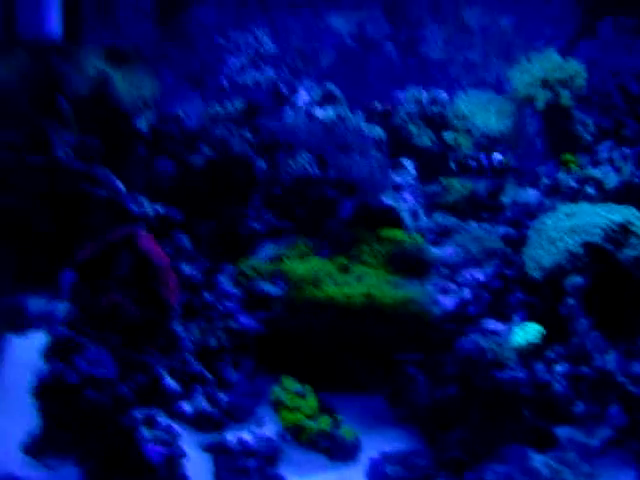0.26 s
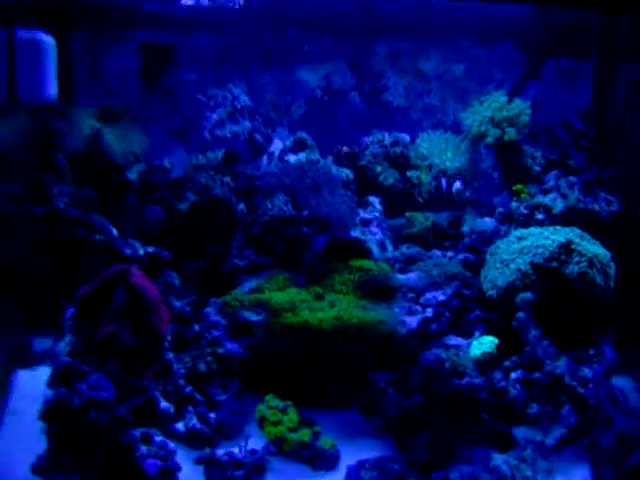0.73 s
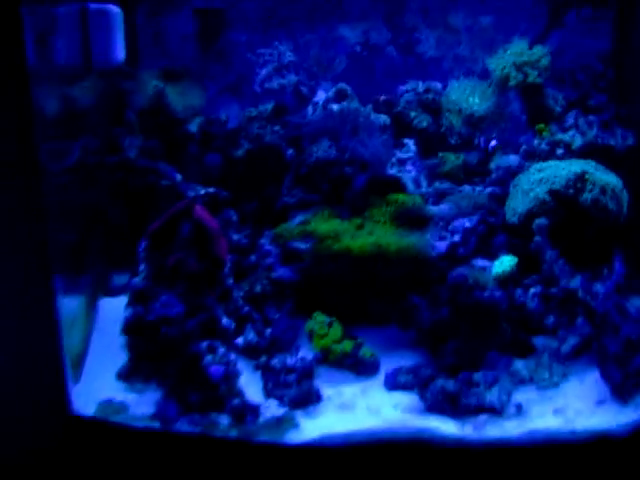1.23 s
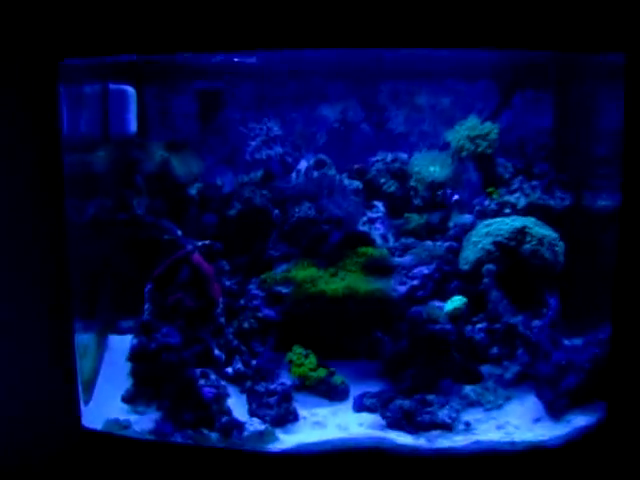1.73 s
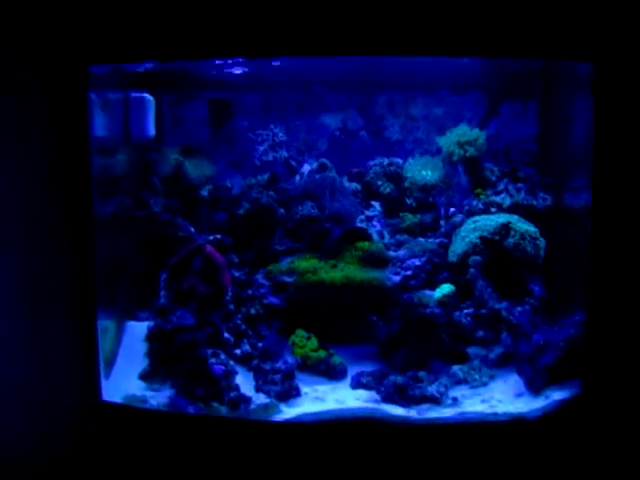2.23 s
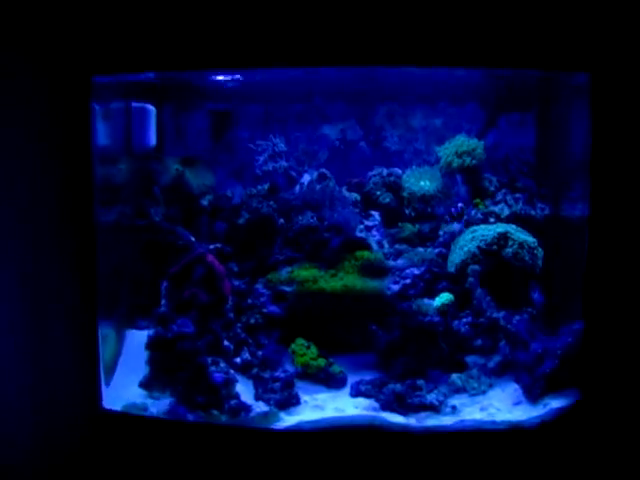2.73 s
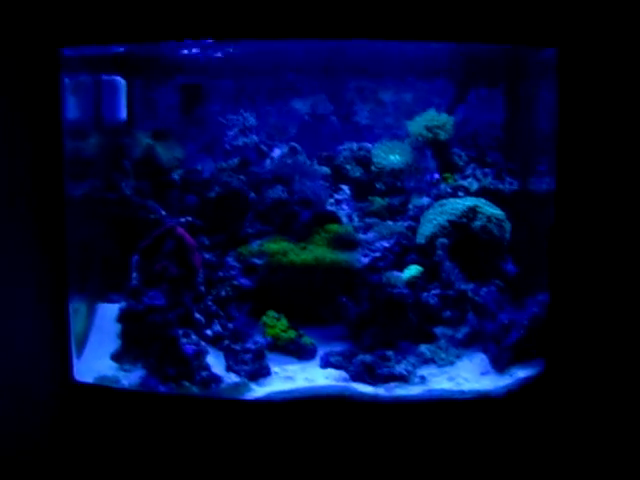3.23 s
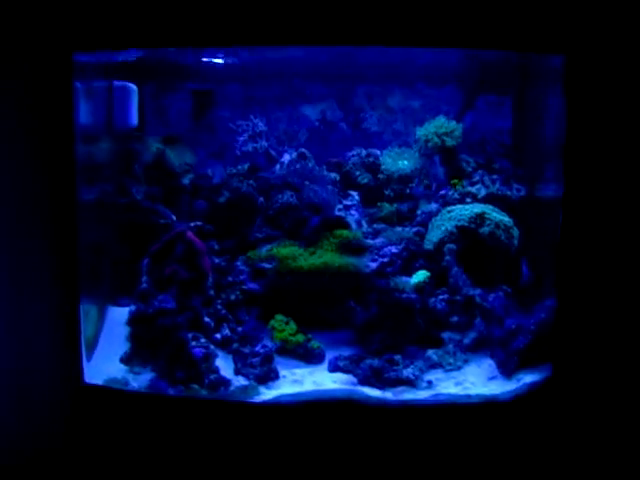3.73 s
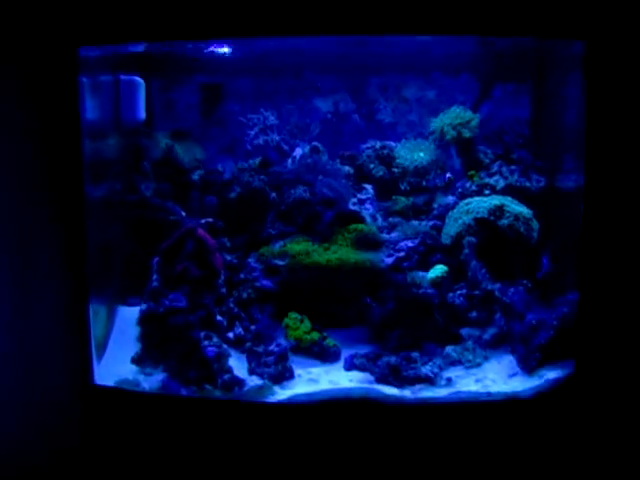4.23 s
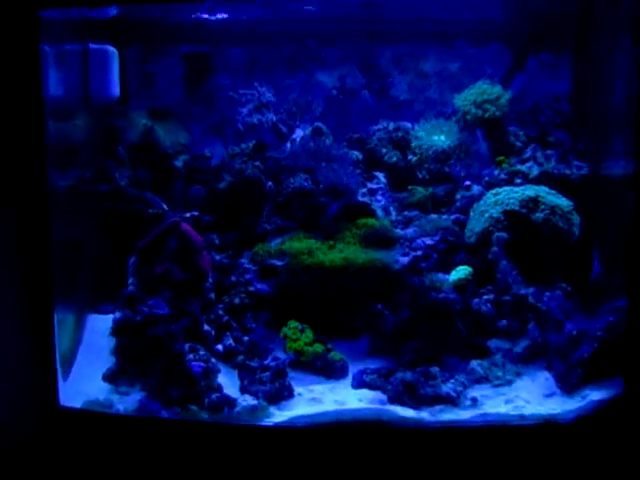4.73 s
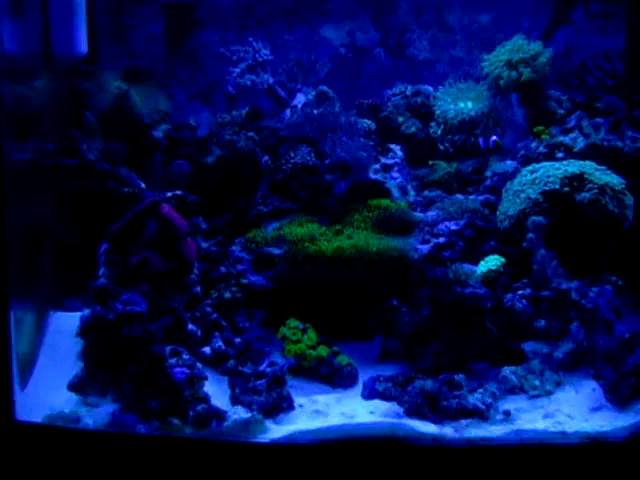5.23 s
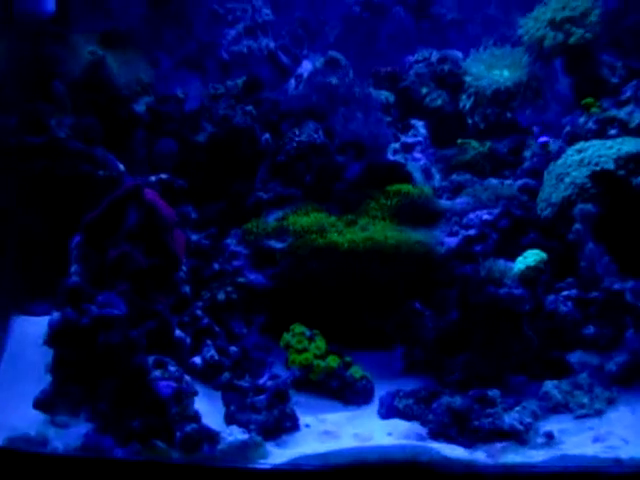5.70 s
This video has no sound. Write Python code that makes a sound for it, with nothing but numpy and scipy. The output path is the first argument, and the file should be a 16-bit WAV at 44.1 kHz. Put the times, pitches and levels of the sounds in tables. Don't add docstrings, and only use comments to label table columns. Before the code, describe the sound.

A close, small microphone in a short-echo room picks up trickling tank water, faint bubbles, steady pump hum and airy hiss. A chair leg stutters over the floor within the first second, cracking grit, then drops. Muffled steps thump on boards around two seconds, cloth brushes at three, and light case ticks continue, with a splashier trickle and faint knocks near the end.

```python
import sys
import numpy as np
from scipy import signal
from scipy.fft import rfft, irfft, next_fast_len
from scipy.io import wavfile
from scipy.ndimage import uniform_filter1d, map_coordinates

SR = 44100
rng = np.random.default_rng(int(sys.argv[2]) if len(sys.argv) > 2 else 0)


def invert_db(level):
    return 10 ** (np.asarray(level, dtype=float) / 20)


def store_pcm(level_fs):
    pcm = np.round(np.clip(level_fs, -1, 1) * 32767).astype(np.int16)
    wavfile.write(sys.argv[1], SR, np.atleast_2d(pcm).T)


N = 262836
MIDDLING_DB = -48


def unit(x):
    return x / np.sqrt(np.mean(x ** 2) + 1e-20)


def along(points, hz):
    f, v = np.transpose(points)
    return np.interp(np.log(hz + 1), np.log(f + 1), v)


def curve(points):
    s, value = np.transpose(points)
    return np.interp(np.arange(N) / SR, s, value)


def wobble(rate):
    knots = rng.standard_normal(int(N * rate / SR) + 4)
    return map_coordinates(knots, [np.arange(N) * rate / SR])


def filtered(x, response):
    m = next_fast_len(N + SR // 2)
    return irfft(rfft(x, m) * response(np.fft.rfftfreq(m, 1 / SR)), m)[:N]


def modes(table):
    def response(f):
        total = 0
        for k, (hz, width, db) in enumerate(table):
            total = total + (-1) ** k * invert_db(db) * 1j * f * width / (hz * hz - f * f + 1j * f * width)
        return total
    return response


def tuned(hz, table):
    return [(f, width, db) for f, (width, db) in zip(hz, table)]


def grit(rate, spread_db):
    hit, size, sign = rng.random((3, N))
    height = invert_db(-spread_db * np.log(size + 0.38))
    return unit((hit < rate / SR) * height * np.sign(sign - 0.5))


def add(track, s, sound):
    part = track[round(s * SR):][:len(sound)]
    part += sound[:len(part)]


def ring(db, hz, t60, rise, rough):
    t = np.arange(SR // 4) / SR
    drift = rough * np.cumsum(rng.standard_normal(len(t))) / np.sqrt(SR)
    return invert_db(db - 60 * t / t60) * (1 - np.exp(-t / rise)) * np.sin(2 * np.pi * hz * t + drift)


def swell(s, rise, fall):
    t = np.arange(N) / SR - s
    return invert_db(-20 * np.abs(t / np.where(t < 0, rise, fall)))


# time in seconds, peak in dB.
SLIPS = [(.4161, -26.5), (.4325, -28.5), (.4467, -28.5), (.4605, -28), (.4729, -28), (.4858, -28),
         (.4991, -27.5), (.5119, -28.5), (.5248, -27.5), (.5383, -27.5), (.5513, -27.5), (.5645, -27.5),
         (.5785, -27.5), (.594, -29.5), (.6561, -25.5), (.7295, -26.5), (.7808, -27), (.8277, -25.5),
         (.843, -31), (.8569, -30.5), (.872, -31), (.8863, -31.5), (.9012, -31.5), (.9145, -30),
         (.9252, -33), (.935, -34.5), (.9434, -32), (.9561, -32.5), (.9644, -34), (.973, -33),
         (.9804, -32.5), (.9872, -33), (.9911, -34.5), (.9962, -33.5), (1.0005, -28), (1.0052, -33),
         (1.0106, -32.5), (1.0196, -35.5), (1.0319, -38), (1.0433, -33), (1.051, -37), (1.0554, -36),
         (1.0599, -35)]
# delay in seconds, level in dB.
ECHOES = [(.0007, 3), (.0027, 0), (.0081, -3), (.0146, -7), (.026, -4), (.035, -10)]
WOOD_HZ = [185, 232, 292, 385, 424, 518, 677, 746, 792, 991, 1025, 1069, 1145, 1195, 1260, 1320, 1422, 1560,
           1760, 1945, 2260, 2440, 2650, 2830, 3120, 3400, 4680, 5150]
# width in Hz, level in dB.
WOOD = [(39.8, -26), (39.7, -13.5), (39.7, -16.5), (29.4, -10), (16, 5), (21, -4.5), (31, -10.5),
        (20, -9.5), (30.8, -7.5), (20, -13.5), (17.8, -8), (20, -12), (19.7, -10.5), (20, -9.5), (20, -17),
        (22, -11), (21.9, -14), (30, -14), (149, -23), (51, -20), (70, -18.5), (35, -11), (50, -24.5),
        (40, -21.5), (60, -24), (60, -30), (70, -30.5), (80, -26.5)]
# frequency in Hz, level in dB per Hz.
DUST = [(800, 1.5), (2500, -2.5), (4900, -11), (6500, -12), (14000, -26)]
# start in seconds, lift in seconds, grit level in dB, drift in dB per second.
DRAG = [
    (0.422, 0.594, -53.5, 6),
    (0.776, 0.813, -46.5, 0),
    (0.822, 0.99, -55, 0),
    (1.034, 1.086, -61, -36),
]
# peak time in seconds, level in dB, rise in seconds, fall
# in seconds.
GRIT_SWELL = (0.81, -49, 0.82, 0.37)


def chair():
    wood_modes = tuned(WOOD_HZ, WOOD)
    seat, frame = modes(wood_modes[:4]), modes(wood_modes[4:])
    click = modes([(1300, 1400, 0)])

    def body(hz):
        return frame(hz) - seat(hz)

    def wood(hz):
        echoes = sum(invert_db(db - 31.5) * np.exp(-2j * np.pi * hz * s) for s, db in ECHOES)
        return body(hz) + click(hz) ** 2 * echoes

    scrape = unit(filtered(grit(900, 4.1), body))
    dust = unit(filtered(grit(2500, 1.6), lambda hz: invert_db(along(DUST, hz))))
    slips = np.zeros(N)
    for s, db in SLIPS:
        slips[round(s * SR)] = invert_db(db + 1.5)
    one_slip = filtered(np.arange(N) == 0, wood)
    out = filtered(slips, wood) / np.abs(one_slip).max()

    t = np.arange(SR // 5) / SR
    out += invert_db(-29) * dust * signal.fftconvolve(slips, np.exp(-t / 0.013))[:N]
    s, db, rise, fall = GRIT_SWELL
    out += invert_db(db) * swell(s, rise, fall) * dust

    for start, lift, dust_db, drift in DRAG:
        since = np.clip(np.arange(N) / SR - start, 0, 1)
        lifted = np.maximum(since - (lift - start), 0)
        load_db = drift * since - 600 * lifted
        grit_db = dust_db + 297 * lifted
        roughen = 1 - np.exp(-since / 0.0054)
        out += roughen * invert_db(load_db) * (invert_db(-47) * scrape + invert_db(grit_db) * dust)
    return out


# time in seconds, board level in dB, board pitch in Hz,
# ring time (60 dB) in seconds, edge level in dB.
DROPS = [
    (1.0015, -19.5, 418.6, 0.1, -55),
    (1.003, -29, 513, 0.056, -58),
    (1.045, -52, 430, 0.03, -50),
    (1.058, -37, 664, 0.12, -45),
]
# time in seconds, board level in dB, board pitch in Hz, edge level in dB.
STEPS = [(1.266, -72, 497, -34), (1.38, -43.5, 550, -57), (1.605, -39, 480, -64), (1.618, -39, 960, -53),
         (1.71, -44, 595, -35.5), (1.739, -34.5, 594, -57), (1.747, -33, 820, -55), (1.751, -37, 560, -53),
         (1.762, -42, 910, -54), (1.8677, -33.5, 395, -58), (1.88, -42, 806, -47),
         (1.9015, -31.5, 400, -53), (1.906, -35, 920, -42), (1.918, -66, 500, -37), (2.041, -40, 416, -42),
         (2.048, -63, 503, -41), (1.743, -44, 336, -60), (1.868, -41, 274, -60), (1.9025, -34.5, 280, -60),
         (2.046, -48, 205, -60), (2.142, -45, 425, -58), (2.393, -43, 448, -63), (3.501, -49, 520, -55),
         (5.73, -50, 781, -51), (5.371, -46, 1400, -60), (5.376, -46, 650, -59), (5.391, -46, 800, -55),
         (5.407, -59, 1300, -47), (5.78, -39, 650, -61), (5.791, -50, 517, -61), (5.922, -47, 890, -51)]


def knocks():
    out, t = np.zeros(N), np.arange(SR // 4) / SR
    joist_hz = 228
    contacts = list(DROPS)
    for s, board_db, board_hz, edge_db in STEPS:
        t60 = 0.022 * invert_db(0.13 * (MIDDLING_DB - board_db))
        contacts.append((s, board_db, board_hz, t60, edge_db))
    for s, board_db, board_hz, t60, edge_db in contacts:
        joist_db = -49 + 0.24 * (board_db - MIDDLING_DB) - 11.5 * np.log2(board_hz / (2 * joist_hz))
        joist_db += 6 * (s == DROPS[0][0])
        noise = signal.lfilter([1, -1], [1, -1.8, 0.83], rng.standard_normal(len(t)))
        heel = invert_db(board_db - 31 - 60 * t / 0.0028)
        edge = noise * (invert_db(edge_db - 19 - 60 * t / 0.066) + heel)
        board = ring(board_db + 3, board_hz, t60, rise=0.02 * t60, rough=0.5 / t60)
        pitch = joist_hz * invert_db(0.6 * rng.standard_normal())
        joist = ring(joist_db + 4.5, pitch, 0.064, rise=0.00064, rough=31.3)
        add(out, s, board + joist + edge)
    return out


# time in seconds, peak in dB, pitch in Hz, ring time (60 dB) in seconds.
BUMPS = [
    (.815, -46, 35, 0.18),
    (4.1484, -41.5, 168, 0.007),
    (5.54, -43.5, 70, 0.033),
    (5.749, -47.5, 60, 0.047),
]


def bumps():
    out = np.zeros(N)
    for s, db, hz, t60 in BUMPS:
        add(out, s, -ring(db + 15.5, hz, t60, rise=0.079 * t60, rough=0))
    return out


# time in seconds, peak in dB, pitch in Hz.
TICKS = [(0.2153, -46, 3040), (0.393, -43, 3270), (0.617, -44, 3000), (0.985, -37, 2450),
         (1.1615, -39, 3670), (1.4152, -50, 4800), (1.5555, -44, 4620), (1.757, -44, 4400),
         (1.878, -50, 3070), (2.0032, -48, 2900), (2.6715, -41.5, 2670), (3.368, -53, 4800),
         (3.504, -49, 3120), (3.7163, -43.5, 4000), (4.132, -44.5, 4060), (4.2428, -42.5, 2910),
         (4.358, -53, 3100), (4.468, -44, 3200), (4.571, -45, 3000), (4.8092, -40.5, 2790),
         (4.97, -44, 2780), (5.226, -42, 2630), (5.73, -41, 2790)]
# time in seconds, peak in dB, pitch in Hz.
SNAPS = [(1.082, -45, 2630), (1.488, -47, 4500), (1.674, -45, 5430), (1.2655, -42, 2450),
         (2.6405, -41, 2450), (2.882, -53, 2880), (3.281, -48, 2620), (3.546, -38, 2560),
         (3.628, -49, 2940), (3.847, -44, 2750), (5.75, -45.5, 2600)]
# time in seconds, peak in dB, pitch in Hz.
GRAINS = [
    (.8422, -38, 3020),
    (0.849, -23.5, 3370),
    (0.85, -33, 5060),
    (0.852, -22, 3440),
    (.8535, -33.5, 4900),
    (4.1504, -42, 1730),
]
# time in seconds, peak in dB, pitch in Hz, snap in dB, ring time in seconds.
CRACK = (4.1501, -33, 5900, -13, .004)


def ticks():
    out, t = np.zeros(N), np.arange(SR // 4) / SR
    events = [CRACK]
    for table, snap_db, t60 in [(TICKS, -16, 0.021), (SNAPS, -10, 0.021), (GRAINS, -16, 0.008)]:
        events += [(*row, snap_db, t60) for row in table]
    for s, db, hz, snap_db, t60 in events:
        snap = invert_db(db + snap_db - 60 * t / 0.0056) * np.diff(rng.standard_normal(len(t) + 1))
        add(out, s, ring(db + 1.5, hz, t60, rise=0.05 * t60, rough=55) + snap)
    return out


# time in seconds, flow in dB.
FLOW = [(0, 4), (.3, -6), (.7, 1), (1.2, -2), (1.55, 3.5), (2.0, 2), (2.5, -1.5), (3.1, -0.5), (3.9, -3.5),
        (4.5, 0), (5.2, -0.5), (5.47, 6.5), (5.65, -2.5), (5.96, -6)]
PIPE_HZ = [781, 845, 1117, 1535, 1780, 1958, 2344, 2465, 2900]
# width in Hz, level in dB.
PIPE = [(24.3, -1), (34.3, -6.5), (33.7, -12), (25.2, -9.5), (21, -10), (35.2, -7), (38, -8.5),
        (58.3, -6.5), (53, -12.5)]
# time in seconds, peak in dB, pitch in Hz.
LOW_DRIPS = [(1.52, -45, 990), (1.562, -43, 766), (2.312, -48, 784), (3.209, -45.5, 808), (4.685, -52, 788),
             (5.374, -56, 742), (5.562, -40, 830), (5.664, -47.5, 779), (5.695, -48, 843),
             (5.778, -53, 653)]
MID_DRIPS = [(0.035, -47.5, 1946), (0.2234, -47.5, 1973), (1.1039, -47.5, 1954), (1.2855, -43, 1960),
             (1.469, -45, 1767), (1.5715, -46, 1760), (1.637, -39, 1775), (3.579, -42.5, 1556),
             (4.365, -45.5, 1950), (4.6038, -50, 1960), (4.77, -51.5, 1960), (4.799, -52, 1830),
             (5.093, -47, 1965), (5.4979, -48, 1947)]
TOP_DRIPS = [(0.022, -53, 2315), (0.1417, -39.5, 2510), (0.1997, -44, 2390), (0.274, -51, 2440),
             (0.288, -37.5, 2564), (0.394, -42, 2306), (1.2816, -41, 2407), (1.493, -43, 2350),
             (1.5776, -53, 2500), (1.7068, -41, 2476), (1.8138, -52, 2270), (1.8309, -46, 2425),
             (2.3277, -51, 2456), (2.5406, -53, 2490), (2.808, -54, 2400), (3.1242, -40.5, 2474),
             (3.3141, -49.5, 2460), (3.523, -51, 2310), (3.5513, -50, 2470), (4.384, -52, 2430),
             (4.496, -46.5, 2460), (4.828, -48, 2550), (4.9831, -44.5, 2487), (5.1928, -47, 2450),
             (5.455, -44, 2490), (5.4987, -44, 2440)]
DRIP_T60 = [0.11, 0.1, 0.079]
DRIP_DAMPS = [0.66, .05, 0.32]


def trickle():
    pipe = tuned(PIPE_HZ, PIPE)
    murmur = np.zeros(N)
    for hz, width, db in pipe:
        splashes = unit(filtered(grit(120, 5.5), modes([(hz, width, 0)])))
        murmur += invert_db(db + 2.3 * wobble(15)) * splashes
    out = invert_db(curve(FLOW) - 65.5) * murmur

    blows = np.zeros(N)
    for drips, middling_t60, damps in zip((LOW_DRIPS, MID_DRIPS, TOP_DRIPS), DRIP_T60, DRIP_DAMPS):
        for s, db, hz in drips:
            t60 = middling_t60 * invert_db(damps * (MIDDLING_DB - db))
            add(out, s, ring(db - 1, hz, t60, rise=0.0014, rough=4.7))
            blows[round(s * SR)] = invert_db(db + 34)
    out += filtered(blows, modes(pipe))

    t = np.arange(SR // 40) / SR
    for when, pitch, size in rng.random((340, 3)):
        hz = 800 * 6 ** pitch
        rising = 2 * np.pi * hz * t * (1 + 9 * t)
        gain = invert_db(-62 + 11 * size - 60 * t * hz / 70) * (1 - np.exp(-t / 0.00044))
        add(out, when * (N - 1) / SR, gain * np.sin(rising))
    return out


# frequency in Hz, level in dB per Hz.
CLOTH = [(400, -62), (1500, -8), (2600, -13), (3300, 3.5), (4550, 9), (5500, 2.5), (6300, -8),
         (9350, -10.5), (10600, -9), (14000, -16)]
# peak time in seconds, rub in dB, fold in dB, rise and fall in seconds.
RUSTLE = [(1.168, -49, -48, 0.036, 0.025), (1.282, -85, -60, .035, .04), (1.714, -61, -66, 0.076, 0.2),
          (1.838, -75, -45, 0.044, 0.0072), (1.912, -66, -50, 0.046, 0.062),
          (2.048, -58, -56, 0.046, 0.069), (2.258, -55.5, -50, 0.019, 0.064),
          (2.642, -77, -49.5, 0.0055, 0.023), (2.977, -51, -46, 0.093, 0.12),
          (3.07, -48, -51, 0.033, 0.0086), (3.081, -33.5, -48, 0.03, 0.0033),
          (3.345, -53.5, -50, 0.007, .05), (3.367, -45.5, -42.5, 0.0066, 0.028),
          (3.404, -58, -46, .05, 0.012), (3.56, -64, -61, 0.075, 0.094)]


def clothes():
    fold_mode = modes([(2500, 2000, 0)])
    rub = filtered(grit(4000, 14), lambda hz: invert_db(along(CLOTH, hz)))
    rub = unit(invert_db(0.91 * wobble(170)) * rub)
    fold = filtered(grit(3000, 2.5), lambda hz: fold_mode(hz) ** 2)
    fold = unit(invert_db(1.5 * wobble(120)) * fold)
    out = np.zeros(N)
    for s, rub_db, fold_db, rise, fall in RUSTLE:
        out += swell(s, rise, fall) * (invert_db(rub_db) * rub + invert_db(fold_db - 6) * fold)
    return out


# frequency in Hz, rms level in dB.
HUM = [(120, -75.5), (180, -70), (240, -62.5), (300, -75), (360, -51.5), (420, -79), (480, -79), (660, -77),
       (780, -67)]


def pump():
    out, t = np.zeros(N), np.arange(N) / SR
    for hz, db in HUM:
        waver = invert_db(0.8 * wobble(6)) * np.exp(0.12j * wobble(8))
        turning = np.exp(2j * np.pi * (hz * t + rng.random()))
        out += np.sqrt(2) * invert_db(db) * np.imag(waver * turning)
    return out


# frequency in Hz, level in dB per Hz.
AIR = [(12, -14), (30, 5.5), (120, -7), (230, -9), (420, -6.5), (600, -12.5), (900, -18.5), (1300, -21.5),
       (2500, -25), (5000, -28.5), (8000, -34.5), (14000, -39.5)]
# time in seconds, stir in dB.
ROOM = [(0, 6.5), (.4, 2.5), (1.15, 6.5), (1.45, 3), (2.1, 7), (2.4, 4), (2.65, 1.5), (4.1, 0), (4.4, 1),
        (5.96, 0)]


def air():
    def low(hz):
        return 1 / (1 + (hz / 1300) ** 2)

    stir_db = curve(ROOM)
    rest_db = -55
    hiss_db = -61.5 + 0.22 * stir_db
    rumble = rng.standard_normal(N)
    rumble = unit(filtered(rumble, lambda hz: invert_db(along(AIR, hz)) * np.sqrt(low(hz))))
    hiss = rng.standard_normal(N) + 0.61 * grit(400, 1.9)
    hiss = unit(filtered(hiss, lambda hz: invert_db(along(AIR, hz)) * np.sqrt(1 - low(hz))))
    fizz = unit(filtered(grit(1500, 3), modes([(10650, 2600, 0)])))
    flicker = invert_db(hiss_db - 21.5 + 0.58 * wobble(42) + 7.3 * wobble(50))
    deep = filtered(rumble, lambda hz: 1 / (1 + (hz / 108) ** 4))
    out = invert_db(rest_db + stir_db + 0.25 * wobble(12)) * (rumble - deep) + invert_db(rest_db) * deep
    return out + invert_db(hiss_db + 1.17 * wobble(25)) * hiss + flicker * fizz


def walls(x):
    t = np.arange(SR // 3) / SR
    tail = uniform_filter1d(rng.standard_normal(len(t)), size=4) * invert_db(-60 * t / 0.1)
    late = np.pad(x, (200, 0))
    return signal.fftconvolve(late, tail / np.linalg.norm(tail))[:N]


def scene():
    leg = chair()
    near = knocks() + bumps() + ticks() + trickle()
    answer = walls(near + invert_db(-6) * leg)
    return (leg + near + invert_db(-12) * answer + clothes() + pump() + air())[None]


def roll_off(x):
    return signal.sosfilt(signal.butter(12, 12680, fs=SR, output="sos"), x)


# frequency in Hz, gain in dB.
MIC = [(15, -27), (60, -22), (130, -4), (250, 0.5), (4500, -2.5), (6200, -7), (8000, -9.5), (9400, -7),
       (10800, 5), (11800, -4), (12600, -32), (14000, -40)]


def record(dry):
    mix = filtered(dry[0], lambda hz: invert_db(along(MIC, hz)))[None]
    return roll_off(mix)


dry = scene()
out = record(dry)
store_pcm(out)
```